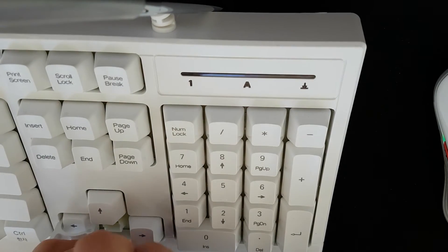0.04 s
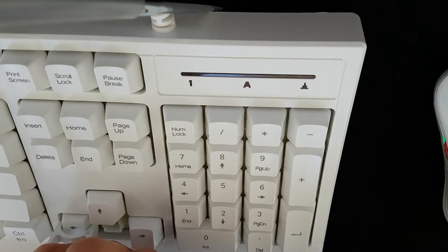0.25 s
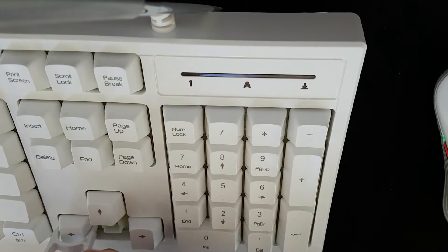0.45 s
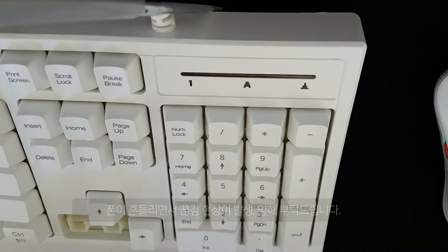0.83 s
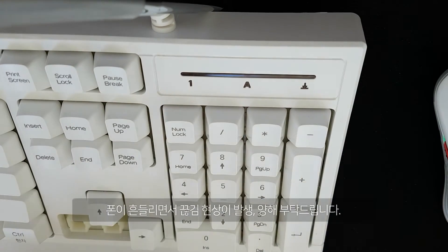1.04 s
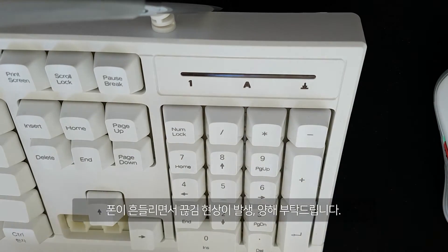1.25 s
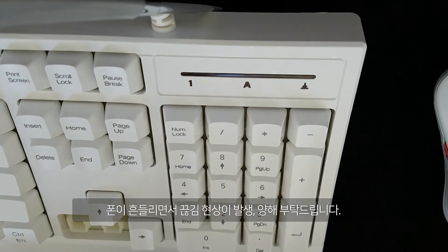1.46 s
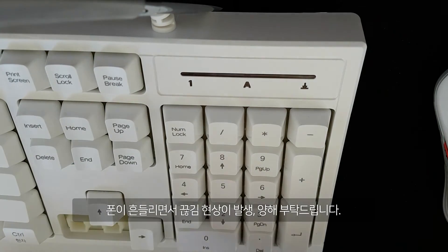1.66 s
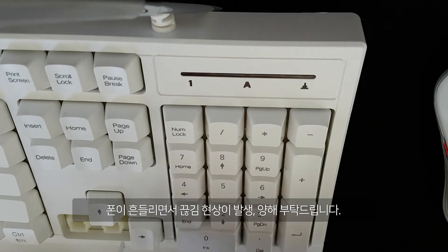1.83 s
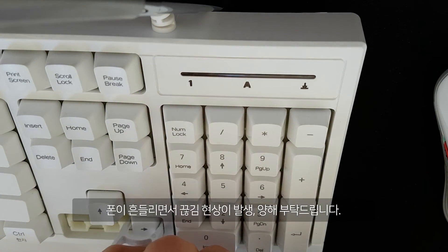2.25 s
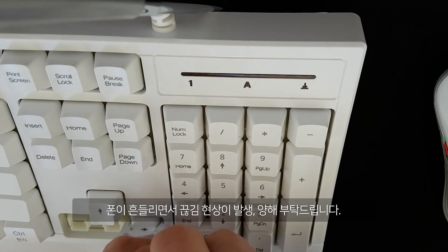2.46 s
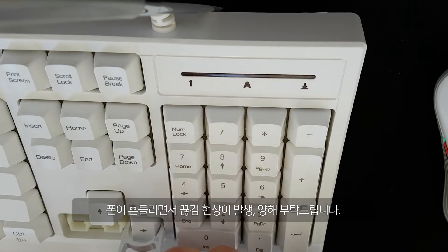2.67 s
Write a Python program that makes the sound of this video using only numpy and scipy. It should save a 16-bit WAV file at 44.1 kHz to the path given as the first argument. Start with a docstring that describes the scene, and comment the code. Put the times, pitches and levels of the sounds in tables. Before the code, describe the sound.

Plastic keycaps snap sharply off a keyboard, with light clicks and clinks in between.

```python
"""Fingers knock and tick on a plastic keyboard, close by on a desk in a small quiet room.
A keycap snaps off its stem, an impulse that sets cap, case and desk ringing in their damped modes,
and is put down on the desk. Loose plastic clinks a little further off, then a second cap is gripped
and snaps off, and a key is pushed home. The room reverberates over a faint rumble and hiss."""
import sys
import numpy as np
from scipy import signal
from scipy.fft import rfft, irfft
from scipy.io import wavfile

SR = 44100
rng = np.random.default_rng(int(sys.argv[2]) if len(sys.argv) > 2 else 0)


def waveform_to_disk(signal):
    """Save audio, clipped to [-1, 1], as 16-bit WAV at the path in sys.argv[1]."""
    frames = np.transpose(np.atleast_2d(signal))
    scaled = np.clip(frames, -1, 1) * 32767
    samples = np.round(scaled).astype(np.int16)
    wavfile.write(sys.argv[1], SR, samples)


N = 119070
RING_TIME = np.arange(SR // 4) / SR
BLOW_ENERGY = SR / 1000  # sum of squared samples of a 0 dB mode or crack

# modes of the keyboard case and of the desk: (frequency [Hz], level [dB], t60 [s])
CASE_MODES = [(341, -16.5, .06), (620.2, -15.5, 0.044), (747.8, -5.5, .06), (970, -4.5, .014),
              (1145, -6, 0.03), (1239, -9.5, 0.055), (1482, -16.5, 0.046), (1718, -11.5, .015),
              (2068, -11.5, 0.032), (2625, -13, .015), (2980, -15, .02)]
DESK_MODES = [(120.5, -1, 0.062), (185, -4.5, .05), (248.7, -7, .03), (405, -2, 0.0097)]


def snaps():
    """Impulse excitation: the stem lets go at once, and cap, case and desk vibrate freely."""
    # (time [s], case [dB], cap [dB], desk [dB], treble step above 9 kHz [dB], pan L-R [dB], room send [dB])
    releases = [(0.221, -18.5, -7.5, -24.5, 1, -1, -7.5), (0.2271, -10.5, -3.5, -27, 2, -3, -6),
                (2.3992, -14, -10, -27, 0, -1.5, -3.5)]
    # modes of each cap: (frequency [Hz], level [dB])
    first_modes = [(4380, -21.5), (5800, -12.5), (6700, -21.5), (7500, -18), (8220, -12), (12120, -12.5),
                   (12600, -9.5), (13170, -13), (15000, -17.5)]
    second_modes = [(4480, -16), (5300, -17.5), (5830, -8.5), (6220, -8), (6560, -11), (7570, -15),
                    (8550, -23), (12350, -15.5)]
    # crack of each cap: (frequency [Hz], spectral density [dB])
    first_crack = [(700, -7), (1200, 2.5), (1900, 7.5), (2600, -7.5), (3400, -3.5), (6000, -3),
                   (8200, -1.5), (10300, -4.5), (12700, 5), (16000, -1.5)]
    second_crack = [(1000, -9.5), (2200, -0.5), (3400, -5), (6000, -1), (8200, 1), (10300, -4), (12700, -3),
                    (16000, -13.5)]
    # a low, heavily damped thud: (frequency [Hz], level [dB], t60 [s])
    thud_modes = [(123, -4.5, 0.06), (327, -1.5, 0.011), (520, 1.5, 0.0066), (1350, -7, .008),
                  (1710, -1, 0.0027)]
    second_cap_from_s, cap_t60_s = 1.0, .012
    out = np.zeros((2, 2, N))
    for s, case_db, cap_db, desk_db, tilt_db, pan_db, room_db in releases:
        modes, spectrum = (first_modes, first_crack) if s < second_cap_from_s else (second_modes, second_crack)
        cap = ring([(hz, db, cap_t60_s) for hz, db in modes]) + crack(spectrum, t60=.015)
        body = from_db(case_db) * ring(CASE_MODES) + from_db(desk_db) * ring(DESK_MODES)
        add(out, s, from_db(cap_db) * tilt(cap, tilt_db) + body, room_db, pan_db)
    # the hardest release also jolts and thuds
    hardest_s = releases[1][0]
    jolt = ring([(220, -3.5, .005)]) * [[1], [-1]]  # one low mode, inverted on the right
    add(out, hardest_s, jolt, room_db=-24.5, pan_db=-5)
    add(out, hardest_s, from_db(-7.5) * ring(thud_modes), room_db=-20)
    return out


def landings():
    """Repeated impact: the cap lands edge first and clatters; its last contact excites the desk modes."""
    # (time [s], level [dB], contact cutoff [Hz], pan L-R [dB])
    impacts = [(.6934, -22, 900, -3), (.69445, -10.5, 2600, -3), (.6985, -17, 9000, -1),
               (.69945, -17, 8000, -4)]
    # the cap on the desk: (frequency [Hz], level [dB], t60 [s])
    modes = [(830, -8, .009), (1005, -1, .011), (1170, -9, .016), (1900, -9, .007), (2780, -12, .01),
             (3730, -13, .012), (4330, -7, .009)]
    # its crack: (frequency [Hz], spectral density [dB])
    spectrum = [(500, -10.5), (1200, -1), (2800, -6), (4400, -3.5), (5400, -18.5), (7300, -9.5), (8300, -8),
                (11000, -14), (13000, -5.5), (16000, -13.5)]
    out = np.zeros((2, 2, N))
    for s, db, cutoff_hz, pan_db in impacts:
        blow = ring(modes) + from_db(1.5) * crack(spectrum, t60=.02)
        add(out, s, from_db(db) * thin(soften(blow, cutoff_hz), hz=450), room_db=-11, pan_db=pan_db)
    last_s, last_db = impacts[-1][:2]
    add(out, last_s, from_db(last_db - 9) * ring(DESK_MODES), room_db=-8.5)
    return out


def fingers():
    """Structure-borne sound: nudged keys knock through case and desk; caps tick on their neighbours."""
    # (time [s], case [dB], desk [dB], contact cutoff [Hz], room send [dB])
    knocks = [(0.0215, -17.5, -26.5, 1910, -7), (.107, -39, -44, 1260, 0), (0.1336, -35.5, -43, 2060, -2.5),
              (0.158, -45, -41, 700, -10), (.479, -46, -58, 1350, -12), (0.5091, -39.5, -43.5, 2472, -16.5),
              (.859, -48.5, -58, 1220, -5), (1.25, -51.5, -50.5, 589.6, -10.5),
              (2.1445, -45, -44.5, 2200, -14.5), (2.205, -42.5, -51.5, 1405, -11),
              (2.3043, -41, -57, 2490, -15.5), (2.66, -47.5, -60, 2510, -8), (2.697, -43.5, -66, 4000, 5)]
    # a key pushed home in its switch: (time [s], level [dB])
    pushes = [(2.5502, -39.5), (2.5586, -39.5), (2.5612, -31.5)]
    # its modes: (frequency [Hz], level [dB], t60 [s])
    key_modes = [(624, -5.5, 0.057), (786, -16, 0.036), (915, -3, 0.031), (1042, -1, 0.028),
                 (1293, -10, 0.032), (1857, -21.5, 0.021), (2630, -19.5, .03)]
    # cap against cap: (time [s], level [dB], contact cutoff [Hz])
    ticks = [(0.0222, -30.5, 6040), (0.1339, -31, 2017), (.165, -35, 9080), (0.1726, -28.5, 7990),
             (.431, -46.5, 3002), (0.4962, -46, 8300), (.513, -41.5, 6000), (.609, -47.5, 3010),
             (.684, -44, 1977), (1.995, -55, 14980), (2.098, -43.5, 4583), (2.1464, -42.5, 13000),
             (2.562, -40, 3560), (2.697, -43, 4010)]
    # their crack: (frequency [Hz], spectral density [dB])
    tick_spectrum = [(400, -10), (1000, 2.5), (2200, 0.5), (3500, -3.5), (5500, -12.5), (8000, -9),
                     (11000, -11.5), (16000, -10)]
    out = np.zeros((2, 2, N))
    for s, case_db, desk_db, cutoff_hz, room_db in knocks:
        case = from_db(case_db) * soften(ring(CASE_MODES), cutoff_hz)
        add(out, s, case + from_db(desk_db) * ring(DESK_MODES), room_db)
    for s, db in pushes:
        push = ring(key_modes) + from_db(-8) * ring(DESK_MODES)
        add(out, s, from_db(db) * push, room_db=-12.5)
    for s, db, cutoff_hz in ticks:
        tick = soften(crack(tick_spectrum, t60=.02), cutoff_hz)
        add(out, s, from_db(db) * tick, room_db=-9.5)
    return out


def clinks():
    """Light, hard contacts excite high modes: loose plastic clinks and slides, off to the right."""
    # (time [s], level [dB], crack t60 [s], contact cutoff [Hz], room send [dB], body ring [dB])
    contacts = [(1.5943, -28, 0.007, 11300, -19, -32.5), (1.5962, -32, 0.0029, 11100, -6, -21),
                (1.63, -30, 0.036, 7560, -0.5, -17), (1.647, -41, 0.036, 7000, 2.5, -9.5),
                (1.662, -40, 0.058, 7000, -9, -12), (1.687, -47, .02, 8100, -11, -7.5),
                (1.722, -44, 0.052, 6400, 0, -2), (1.726, -33.5, 0.068, 8600, -10, -17.5),
                (1.337, -55, 0.018, 11960, -5, -4.5)]
    # bright modes and lower body modes: (frequency [Hz], level [dB], t60 [s])
    bright_modes = [(4800, -13, .01), (5300, -8, .012), (6000, -7, .01), (6950, -8, .009), (8190, -8, .011)]
    body_modes = [(1660, -4.5, 0.013), (2246, -3, 0.025), (2714, -7.5, 0.0067), (3266, -3.5, 0.042)]
    # crack of a contact: (frequency [Hz], spectral density [dB])
    spectrum = [(800, -30), (2300, -21), (4000, -7), (6000, -4), (8300, 1), (10500, -14), (13000, -7.5),
                (16000, -7)]
    out = np.zeros((2, 2, N))
    for s, db, t60, cutoff_hz, room_db, body_db in contacts:
        bright = crack(spectrum, t60) + from_db(-5.5) * ring(bright_modes)
        clink = thin(bright, hz=3050) + from_db(body_db) * ring(body_modes)
        add(out, s, from_db(db) * soften(clink, cutoff_hz), room_db, pan_db=-4.5)
    return out


def ring(modes, scatter_db=.5, left_lag_rad=1.2):
    """Modal superposition: damped sines, varying in strength per blow and lagging a little on the left."""
    out = 0
    for hz, db, t60 in modes:
        t = np.array([RING_TIME - left_lag_rad / (2 * np.pi * hz), RING_TIME])
        mode = np.sin(2 * np.pi * hz * t) * dying(t, t60)
        mode *= np.sqrt(BLOW_ENERGY / np.sum(mode[1] ** 2))
        strength = from_db(db + scatter_db * rng.standard_normal((2, 1)))
        out = strength * mode - out  # successive modes alternate in sign
    return out


def crack(spectrum, t60):
    """Modal overlap: the dense, short-lived modes of a small plastic part merge into decaying noise."""
    burst = coloured(spectrum, len(RING_TIME), correlation=.05) * dying(RING_TIME, t60)
    return burst * np.sqrt(BLOW_ENERGY / np.sum(burst ** 2, axis=1, keepdims=True))


def soften(x, hz):
    """Contact time limits bandwidth: a softer contact excites less treble."""
    return signal.sosfilt(signal.butter(2, min(hz, .45 * SR), fs=SR, output="sos"), x)


def thin(x, hz):
    """Radiation efficiency: a part small against the wavelength radiates little bass."""
    return signal.sosfilt(signal.butter(2, hz, "high", fs=SR, output="sos"), x)


def tilt(x, step_db, pivot_hz=9000):
    """Spectral tilt: the band above the pivot gains step_db on the band below it."""
    low = signal.sosfilt(signal.butter(3, pivot_hz, "low", fs=SR, output="sos"), x)
    high = signal.sosfilt(signal.butter(3, pivot_hz, "high", fs=SR, output="sos"), x)
    return low * from_db(-step_db / 2) + high * from_db(step_db / 2)


def dying(t, t60):
    """Exponential damping: from t = 0 the amplitude falls 60 dB every t60 seconds."""
    return (t >= 0) * np.exp(-np.log(1000) * np.maximum(t, 0) / t60)


def from_db(db):
    """Amplitude ratio of a level in decibels."""
    return 10 ** (np.asarray(db) / 20)


def add(buses, s, sound, room_db, pan_db=0):
    """Two paths: a panned sound enters the direct bus (0) and the room send (1) at time s."""
    start = max(int(s * SR), 0)
    panned = sound * from_db([[pan_db / 2], [-pan_db / 2]])
    part = panned[:, :max(N - start, 0)]
    span = slice(start, start + part.shape[1])
    buses[0, :, span] += part
    buses[1, :, span] += part * from_db(room_db)


def room(x):
    """Reverberation: convolution with early reflections, a low boom and a tail that dies band by band."""
    # colour of the reflections: (frequency [Hz], gain [dB])
    colour = [(100, -4), (300, -5.5), (480, -8), (800, -3.5), (2000, 0), (4000, 0.5), (7000, 1.5),
              (12000, 0), (16000, 2.5)]
    # reverberation time: (frequency [Hz], t60 [s])
    decay_times = [(150, 0.26), (500, 0.48), (1100, 0.28), (3000, 0.24), (6500, 0.25), (10000, 0.2),
                   (15000, 0.25)]
    tail_delay_s, early_delay_s, boom_delay_s = .0052, .0105, .016
    correlation, boom_hz, size = .6, 124, SR // 2
    t, hz = np.arange(size) / SR, np.fft.rfftfreq(size, 1 / SR)
    centres_hz, t60s = np.transpose(decay_times)
    noise = rfft(stereo_noise(size, correlation))
    tail = 0
    for share, t60 in zip(np.eye(len(t60s)), t60s):
        band = irfft(noise * at_hz(np.c_[centres_hz, share], hz), size)  # overlapping triangular bands
        fade = dying(t - tail_delay_s, t60)
        tail = tail + band * fade / np.linalg.norm(fade)
    fade = dying(t - early_delay_s, t60=.06)
    early = from_db(-3) * stereo_noise(size, correlation) * fade / np.linalg.norm(fade)
    gain = from_db(at_hz(colour, np.fft.rfftfreq(2 * size, 1 / SR)))
    reflections = irfft(rfft(tail + early, 2 * size) * gain)[:, :size]
    boom = np.sin(2 * np.pi * boom_hz * (t - boom_delay_s)) * dying(t - boom_delay_s, t60=.07)
    response = (reflections + from_db(-41.5) * boom) / np.sqrt(2)
    return signal.fftconvolve(x, response, axes=1)[:, :N]


def background():
    """Amplitude-modulated noise: hiss and rumble sink after the first snap, creep back and sink again."""
    # (frequency [Hz], spectral density [dB])
    hiss = [(500, 4.5), (1500, 5.5), (2500, 0), (4500, -7), (8500, -11), (10500, -17), (16000, -29.5)]
    top_hiss = [(5000, -39.5), (9000, -11.5), (10500, -2), (13500, 1.5), (16000, -0.5)]
    rumble = [(25, -3), (60, 3), (100, -7), (150, -2.5), (183, 8), (210, -1), (247, 8), (285, -4.5),
              (340, -9.5), (500, -17), (800, -14), (1500, -28), (3000, -50)]
    # (time [s], level [dB])
    hiss_level = [(0, -60.5), (.21, -79), (0.249, -76.5), (.65, -83.5), (.95, -74), (1.3, -74), (1.55, -67),
                  (2.38, -67), (2.449, -55.5), (2.7, -76.5)]
    top_level = [(0, -80.5), (.21, -75), (.25, -97), (.9, -95.5), (1.2, -86.5), (1.5, -76), (2.38, -76),
                 (2.45, -75.5), (2.7, -82)]
    rumble_level = [(0, -52.5), (.21, -48), (.25, -62), (.65, -65.5), (1.0, -66), (1.35, -57.5),
                    (1.65, -54.5), (2.38, -51.5), (2.448, -51.5), (2.7, -59.5)]
    layers = (hiss, hiss_level, .14), (top_hiss, top_level, .14), (rumble, rumble_level, .99)
    out = 0
    for spectrum, level, correlation in layers:
        envelope = from_db(np.interp(np.arange(N) / SR, *np.transpose(level)))
        out = out + envelope * coloured(spectrum, N, correlation)
    return out


def coloured(spectrum, size, correlation):
    """Spectral shaping: stereo noise with the given relative spectrum, scaled to rms 1."""
    gain = from_db(at_hz(spectrum, np.fft.rfftfreq(size, 1 / SR)))
    noise = irfft(rfft(stereo_noise(size, correlation)) * gain, size)
    return noise / noise.std()


def stereo_noise(size, correlation):
    """Partial coherence: common and opposed white noise mix to set the correlation of the channels."""
    mid, side = rng.standard_normal((2, size))
    return (np.sqrt(1 + correlation) * mid + np.sqrt(1 - correlation) * side * [[1], [-1]]) / np.sqrt(2)


def at_hz(points, hz):
    """Interpolation of (frequency, value) points on a logarithmic frequency axis."""
    points_hz, values = np.transpose(points)
    return np.interp(np.log(np.maximum(hz, 1)), np.log(points_hz), values)


def scene():
    """Superposition of direct sound, reverberation that mixes left and right, and background."""
    direct, send = snaps() + landings() + fingers() + clinks()
    reverb = (room(send) + room(send[::-1])) / np.sqrt(2)
    return direct + reverb + background()


def record(dry):
    """Clipping and band limiting: the loudest snap overloads, and a steep low-pass cuts the top."""
    lowpass = signal.ellip(12, .2, 95, 16100, fs=SR, output="sos")
    return signal.sosfilt(lowpass, np.clip(dry, -1, 1))


dry = scene()
out = record(dry)
waveform_to_disk(out)
```